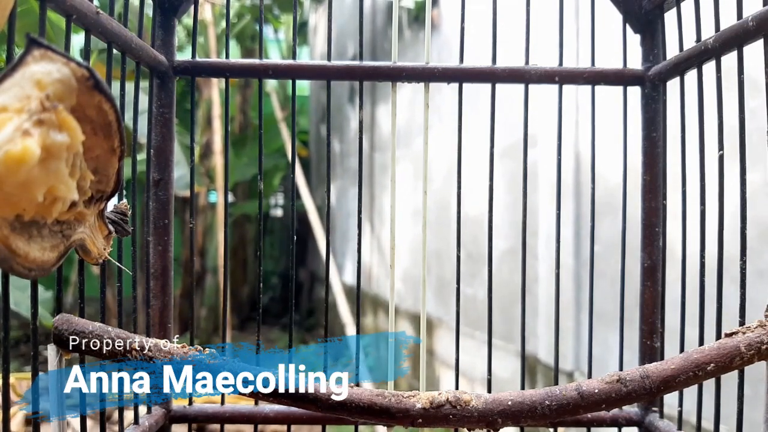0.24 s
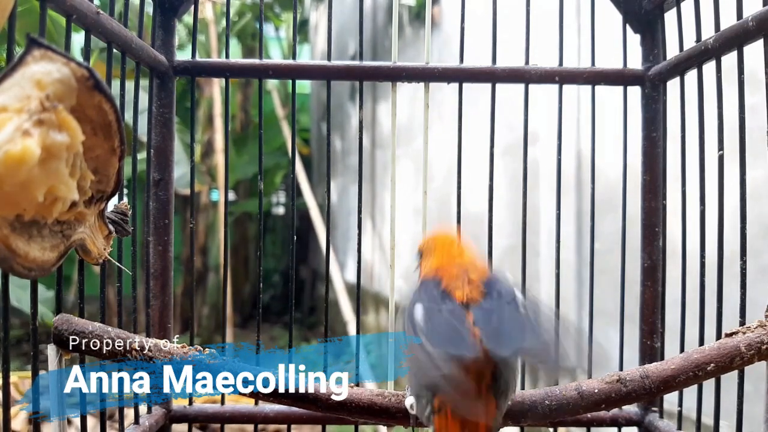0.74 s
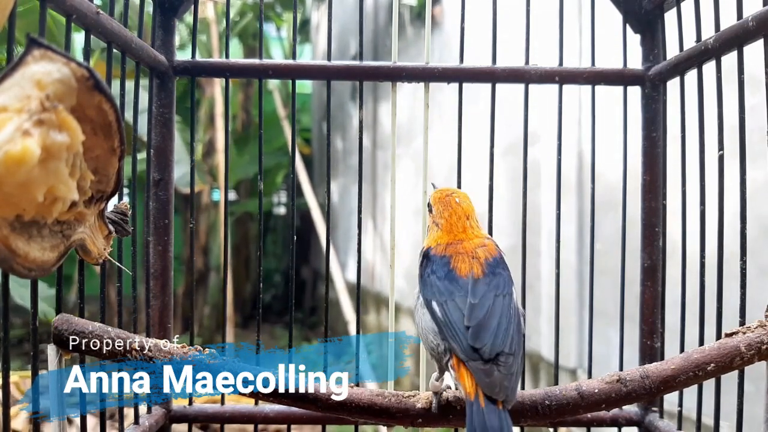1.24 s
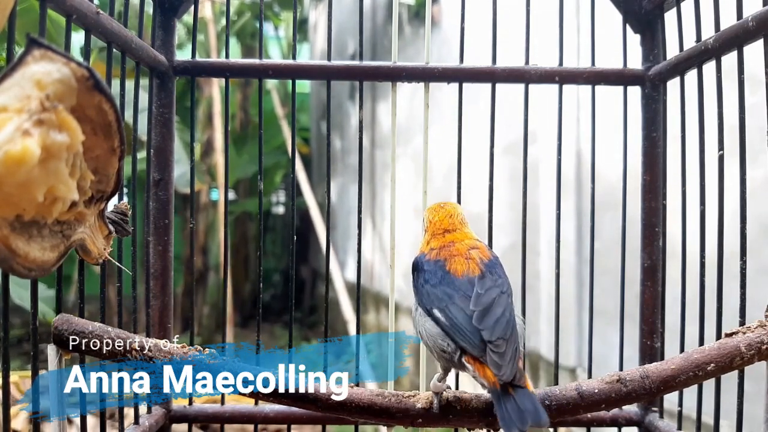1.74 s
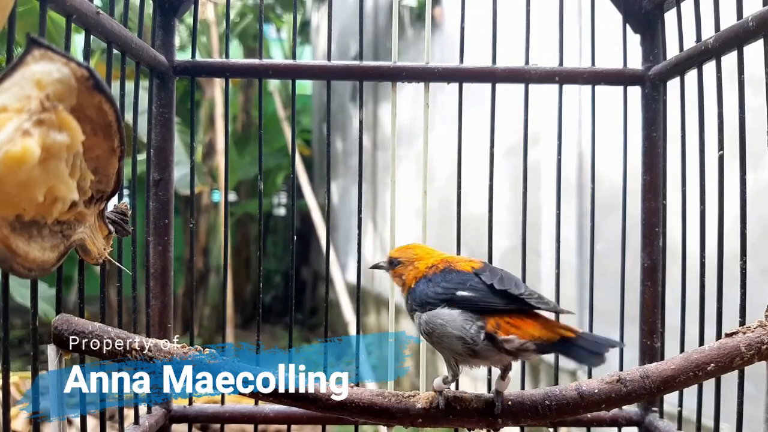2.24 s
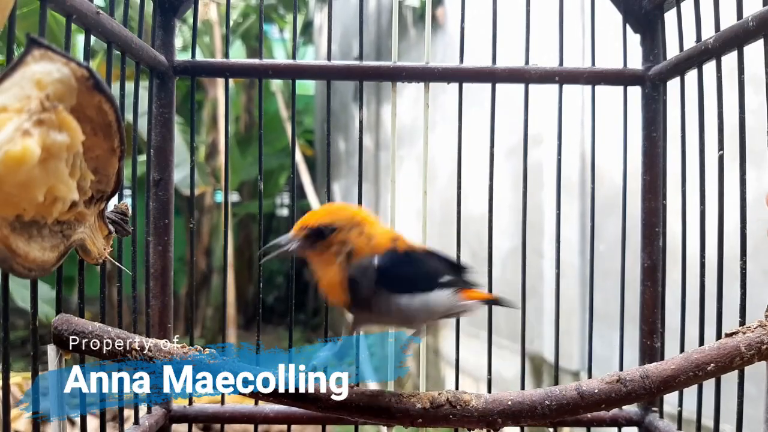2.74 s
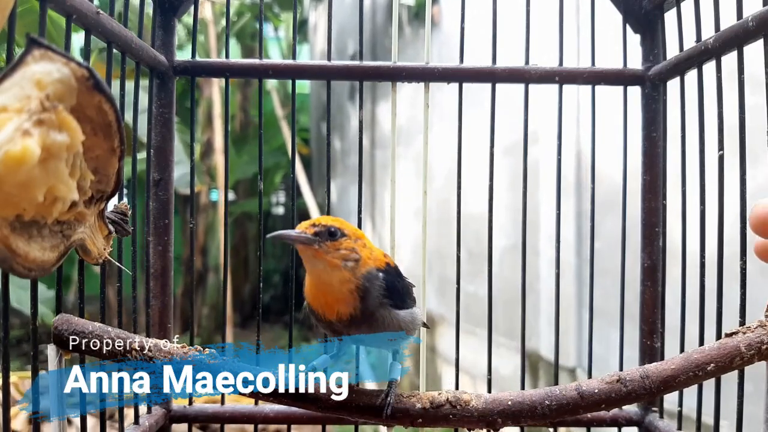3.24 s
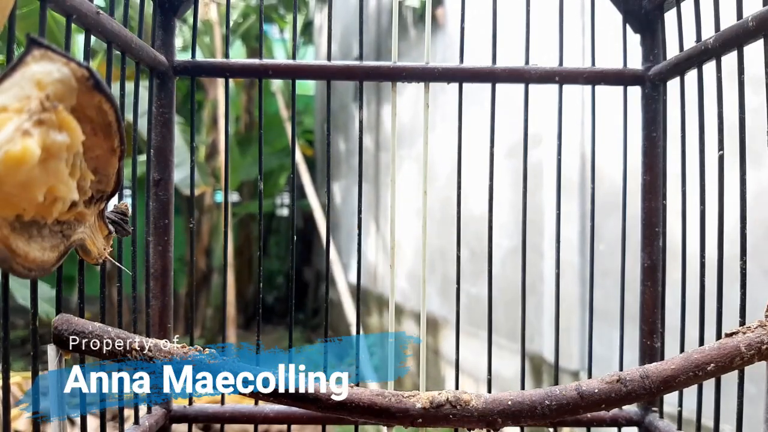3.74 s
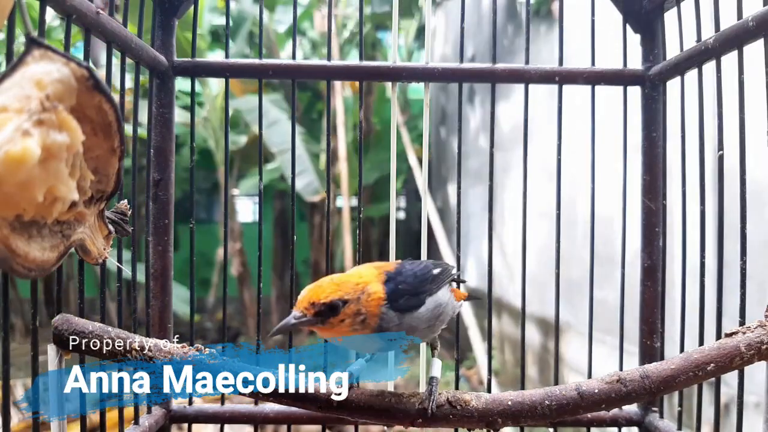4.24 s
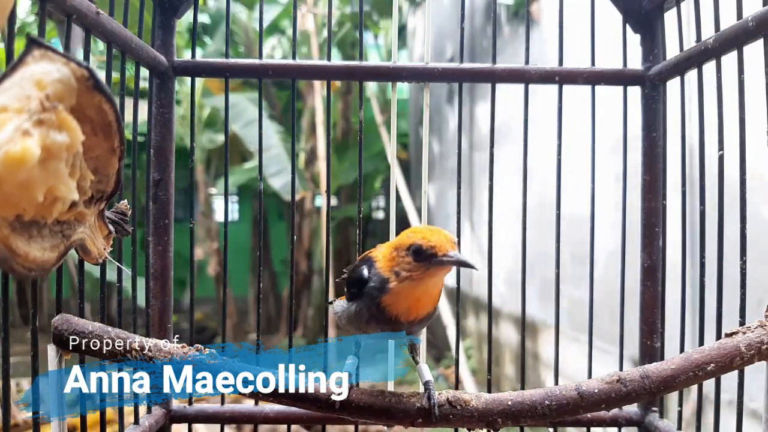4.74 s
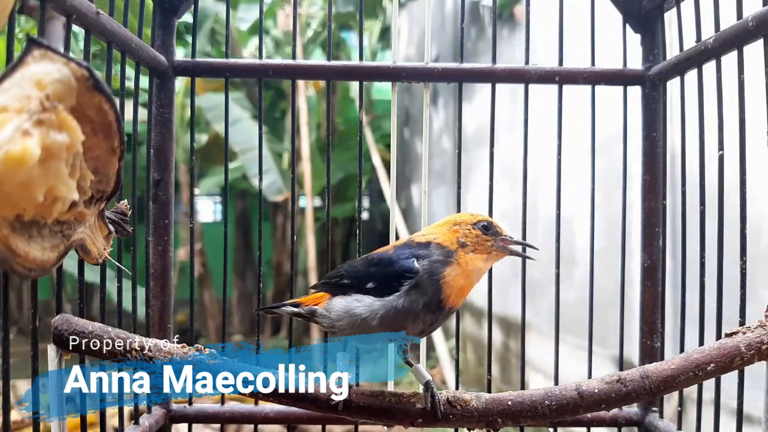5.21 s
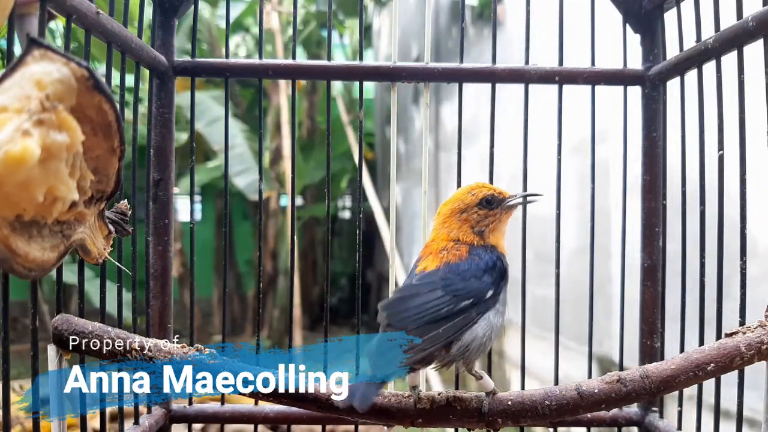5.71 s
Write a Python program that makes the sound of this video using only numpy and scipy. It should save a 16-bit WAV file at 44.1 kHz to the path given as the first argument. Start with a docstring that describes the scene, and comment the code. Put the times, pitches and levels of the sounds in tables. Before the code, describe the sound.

Close stereo pickup of one caged bird, nearly dry with a short bright echo. Loud thin whistles alternate between sudden upward breaks and gliding descents, roughly two or three a second, then thin out before scratchy chips past the middle. Distant birds answer weakly with nasal squawks, squeals and one long soft arching whistle near the end. Low outdoor noise swells quietly underneath.

```python
"""In a yard, a small caged songbird close to the microphone alternates rising and falling whistles and harsh chips.
Its notes are nearly pure tones swept in pitch, shaken where the voice is rough; its feet tick as noise bursts.
Other birds squawk, squeal and whistle further off, heard mostly by way of the walls, as modulated harmonics.
With them a hoarse hiss near 2 kHz comes in waves, made of rough sinking tones through a band-pass.
Beneath lie a few dull thuds and a faint low rumble of coloured noise with a wavering drone."""
import sys
import numpy as np
from scipy import signal
from scipy.fft import rfft, irfft
from scipy.io import wavfile
from scipy.ndimage import uniform_filter1d, minimum_filter1d, map_coordinates

SR = 44100
rng = np.random.default_rng(int(sys.argv[2]) if len(sys.argv) > 2 else 0)


def transcribe(signal):
    """Save signal, clipped to [-1, 1], as a 16-bit WAV file at the path in sys.argv[1]."""
    frames = np.atleast_2d(signal).T
    limited = np.clip(frames, -1, 1)
    pcm = np.round(limited * 32767).astype(np.int16)
    wavfile.write(sys.argv[1], SR, pcm)


N = 263277
TIME = np.arange(N) / SR
TOP_HZ = 15900  # upper limit of the recorder


def undb(db):
    """Amplitude gain is ten to the power of decibels over twenty."""
    return 10 ** (np.asarray(db) / 20)


def unit(x):
    """Normalisation: scale to an rms of 1."""
    return x / np.sqrt(np.mean(x ** 2) + 1e-20)


def join(t, times, values):
    """Linear interpolation through points, with their times forced into order."""
    return np.interp(t, np.maximum.accumulate(times), values)


def band(x, lo_hz, hi_hz):
    """Band-pass filtering keeps the energy between two frequencies."""
    edges = [lo_hz, min(hi_hz, .45 * SR)]
    return signal.sosfilt(signal.butter(2, edges, "band", fs=SR, output="sos"), x)


def wobble(count, hz):
    """Low-passed noise: random motion up to a given speed, of rms 1 before its settling time is cut off."""
    lowpass = signal.butter(4, min(hz, .45 * SR), fs=SR, output="sos")
    noise = signal.sosfilt(lowpass, rng.standard_normal(count + SR // 5))
    return unit(noise)[-count:]


def span(start, end):
    """Sampling instants of a note [s], at least 5 ms long and none before zero."""
    first = int(max(start, 0) * SR)
    last = int(max(end, start + .005) * SR)
    return np.arange(first, last) / SR


def add(out, t, sound):
    """Superposition: mix a sound in at its time."""
    i = min(int(round(t[0] * SR)), N)
    out[..., i:i + sound.shape[-1]] += sound[..., :N - i]


def edges(count, edge_s):
    """A tapered window avoids clicks at both ends of a note."""
    return signal.windows.tukey(count, min(1, 2 * edge_s * SR / count))


def syrinx(t, hz, db, rough, overtone_db, pan_db, lead, waver=0.005, rasp=0.13, flutter_db=2.0,
           rolloff_db=-10, side_hz=3900, side_db=-38, outer_db=-12, air_db=-58, scratch_db=-23,
           edge_s=0.0027):
    """Frequency and amplitude modulation: a nearly pure tone at two ports shakes when the voice is rough."""
    count = len(t)
    smooth_hz = uniform_filter1d(hz, SR // 330)
    hz = smooth_hz * (1 + waver * wobble(count, 190) + rasp * rough * wobble(count, 1100))
    phase = 2 * np.pi * np.cumsum(hz) / SR
    shaken_db = db + flutter_db * wobble(count, 140) + 5.2 * rough * wobble(count, 700)
    size = undb(shaken_db) * edges(count, edge_s)
    # faint tones about 3.9 and 7.8 kHz either side of the whistle, stronger when it is loud
    beat = 2 * np.pi * np.cumsum(side_hz + 45 * wobble(count, 300)) / SR
    side_gain = undb(side_db + 0.27 * (db - db.max()))
    size = size * (1 + 2 * side_gain * (np.cos(beat) + undb(outer_db) * np.cos(2 * beat)))
    third_fade = np.clip((SR / 2 - 3 * hz) / 1000, 0, 1)  # no third harmonic past half the sampling rate
    ports = []
    for side in (1, -1):
        p = phase + side * lead / 2
        tone = np.sin(p) + undb(overtone_db) * np.sin(2 * p)
        tone = tone + undb(overtone_db + rolloff_db) * np.sin(3 * p) * third_fade
        air_gain = undb(air_db) + rough * undb(scratch_db)
        air = air_gain * unit(band(rng.standard_normal(count), 4000, 10000))
        ports.append(undb(side * pan_db / 2) * (np.sqrt(2) * tone + air))
    # the mean power of the two ports does not depend on the level difference
    return size * np.array(ports) / np.sqrt(np.cosh(pan_db * np.log(10) / 20))


def release(t, end, close_s=0.016, depth_db=27):
    """Accelerating decay [dB]: the note dies ever faster as the syrinx closes."""
    return -depth_db * np.clip(1 + (t - end) / close_s, 0, 1) ** 2


def rising_whistles(break_db=12, break_s=0.0006, leap_rough=0.23):
    """Upward sweep: a soft lead-in dips, then leaps to a loud held top, the voice breaking and rough at the leap."""
    # rising whistles: (leap [s], lead-in [s], opening pitch [Hz], top pitch [Hz], level [dB],
    # lead-in over top [dB], octave over fundamental [dB], left minus right [dB], left phase lead [rad])
    rises = [(0.02, 0.019, 3814, 5262, -10, -5, -29.5, 2.5, -1.5),
             (0.652, .026, 4850, 5858, -20, -5.5, -20.5, 3, -2),
             (1.09, 0.025, 4440, 5425, -26, -3.5, -44, 1, -2.5),
             (1.496, 0.027, 4780, 5975, -17, -7, -35.5, 1, -2.5),
             (1.916, 0.047, 4698, 5870, -13.5, -6.5, -30, 2.5, 2.1),
             (2.424, .035, 5900, 6000, -23, -7, -15.5, 3.5, -1.2),
             (2.991, 0.036, 4140, 5610, -10, -5.5, -37, 14, 5.5),
             (3.55, 0.025, 5530, 5835, -24.5, 6, -19, 4, 1.8),
             (5.171, 0.041, 6408, 6100, -7.5, -17.5, -22, 0.5, 2.0),
             (5.643, 0.03, 4500, 5960, -7, -12.5, -23.5, 1, 2.0),
             (5.952, 0.05, 6400, 5805, -13, -16, -32, 4, -2)]
    dip_share = .815  # dip pitch over top pitch
    hold_s, hold_fade_db = 0.044, 1.5  # length of the top and its fade
    out = np.zeros((2, N))
    for knee, lead_s, open_hz, top_hz, db, lead_db, octave_db, pan_db, lead in rises:
        end = knee + hold_s
        t = span(knee - lead_s, end)
        from_knee, dip_hz = t - knee, dip_share * top_hz
        leap_hz = dip_hz + .38 * (top_hz - dip_hz)
        hz = join(from_knee, [-lead_s, -.018, -.004, .004, .018, hold_s],
                  [open_hz, dip_hz, leap_hz, .98 * top_hz, 1.006 * top_hz, .985 * top_hz])
        swell_db = join(from_knee, [-lead_s, -.018, -.010, 0, .005],
                        [lead_db - 21, lead_db - 11, lead_db, lead_db, 0])
        swell_db = swell_db - break_db * np.exp(-(from_knee / break_s) ** 2)
        swell_db = swell_db + hold_fade_db * (.5 - np.maximum(from_knee / hold_s, 0)) * (from_knee > 0)
        rough = .005 + leap_rough * np.exp(-(from_knee / 0.0035) ** 2)
        level_db = db + swell_db + release(t, end)
        add(out, t, syrinx(t, hz, level_db, rough, octave_db, pan_db, lead))
    return out


def falling_whistles():
    """Exponential glide: a thin high start slides down and swells as it settles."""
    # falling whistles: (start [s], swell [s], length [s], top pitch [Hz], bottom pitch [Hz], level [dB],
    # octave over fundamental [dB], left minus right [dB], left phase lead [rad])
    falls = [(.175, 0.028, 0.061, 8340, 6160, -6, -22, -1, -1.14),
             (0.787, 0.064, 0.1, 8270, 6690, -15.5, -23, 4.5, -1.1),
             (1.665, 0.082, .110, 8550, 6592, -7.5, -31.5, 2, -2.5),
             (2.699, .060, 0.097, 8270, 6620, -9.5, -24.5, 13.5, 2),
             (5.316, 0.082, 0.097, 8260, 6610, -9, -28.5, 6.5, 3.5),
             (5.749, 0.027, 0.1, 6940, 6470, -14, -32.5, 2.5, 4)]
    out = np.zeros((2, N))
    for start, swell_s, length, top_hz, bottom_hz, db, octave_db, pan_db, lead in falls:
        end = start + length
        t = span(start, end)
        glide_s = .009 + 0.18 * swell_s  # the slower the swell, the slower the slide
        slide = np.exp(-np.maximum(t - start - .01, 0) / glide_s)
        hz = bottom_hz + (top_hz - bottom_hz) * slide
        swell_db = -34 * np.clip(1 - (t - start) / swell_s, 0, 1) ** 1.6
        level_db = db + swell_db + release(t, end)
        add(out, t, syrinx(t, hz, level_db, 0.016, octave_db, pan_db, lead))
    return out


def chips(second_rough=0.32):
    """Two sources: rough arches, joined from the crest on by a second pitch from the other side of the syrinx."""
    # harsh chips: (crest [s], rise [s], fall [s], crest pitch [Hz], level [dB], roughness [0-1],
    # octave over fundamental [dB], second voice [Hz], second voice over first [dB],
    # left minus right [dB], left phase lead [rad])
    arches = [(3.524, 0.021, 0.007, 5590, -21.5, 0.09, -22.5, 4510, 4, 2, 1.8),
              (4.047, 0.0058, 0.019, 6030, -14.5, 0.6, -18, 4450, -9.5, 4, -1.0),
              (4.137, .018, 0.045, 6740, -9, 0.14, -21.5, 6580, -11.5, 8, 1.44),
              (4.254, .020, 0.023, 4405, -19.5, 0.15, -3, 4020, -15, 10, -1),
              (5.744, 0.0035, 0.012, 4445, -26.5, 0.28, -31, 6220, -5.5, 2, -1)]
    start_share = 0.53  # opening pitch over crest pitch
    sag_hz_per_s, gain_after_crest_db = 32000, 5.5
    out = np.zeros((2, N))
    for (crest, rise_s, fall_s, crest_hz, db, rough, overtone_db,
         second_hz, second_db, pan_db, lead) in arches:
        end = crest + fall_s
        t = span(crest - rise_s, end)
        before = np.clip((crest - t) / rise_s, 0, 1)
        after = np.maximum(t - crest, 0)
        hz = crest_hz * (1 - (1 - start_share) * before ** 2) - sag_hz_per_s * after
        shape_db = -22 * before ** 2 + gain_after_crest_db * after / fall_s
        shape_db = shape_db + release(t, end, close_s=0.045, depth_db=15)
        add(out, t, syrinx(t, hz, db + shape_db, rough, overtone_db, pan_db, lead))
        t = span(crest, end + 0.005)
        hz = np.full(len(t), 1. * second_hz)
        level_db = db + second_db + release(t, t[-1], close_s=0.023, depth_db=22.5)
        add(out, t, syrinx(t, hz, level_db, second_rough, -15, pan_db, lead))
    return out


def hops(tick_s=0.0032):
    """Impact noise: claws tick on wood as high-band bursts that decay exponentially."""
    # feet on the perch and bars: (time [s], level before the decay [dB])
    ticks = [(0.547, -54.5), (3.759, -61.5), (3.965, -54), (4.239, -30.5)]
    out = np.zeros(N)
    for start, db in ticks:
        t = span(start, start + 0.026)
        noise = unit(band(rng.standard_normal(len(t)), 3300, 15000))
        add(out, t, undb(db) * np.exp((t[0] - t) / tick_s) * noise)
    return out


def far_tone(t, hz, db, rough, colour, edge_s, rasp=.11, flutter_db=4, count=5):
    """Source and filter: harmonics of one distant sound, clear to scratchy, are weighted by a spectrum."""
    pitch = hz * (1 + rasp * rough * wobble(len(t), 248))
    phase = 2 * np.pi * np.cumsum(pitch) / SR
    colour_hz, colour_db = np.transpose(colour)
    tone = np.zeros(len(t))
    for k in range(1, count + 1):
        weight = undb(join(np.log(k * hz), np.log(colour_hz), colour_db))
        tone += weight * np.sin(k * phase) * (k * pitch < TOP_HZ)
    # uneven cycles spread a haze around each partial
    haze = 1 + .65 * rough * wobble(len(t), hz[0] / 4)
    size = undb(db + flutter_db * wobble(len(t), 60)) * haze
    return np.sqrt(2) * tone * size * edges(len(t), edge_s)


def squawks(scoop=.04, swell_s=0.055):
    """Voice break: a clear nasal note creeps up and swells, then roughens as a second, higher voice joins."""
    # squawks: (start [s], break [s], end [s], pitch [Hz], level before throat and mixing [dB],
    # roughness after the break [0-1], second voice over first [dB])
    calls = [(-.06, 0.001, 0.24, 2515, -46, 0.24, 1.5), (1.407, 1.504, 1.65, 2474, -43, 0.46, -2),
             (3.038, 3.167, 3.235, 2224, -41, 0.18, 1), (4.144, 4.20, 4.354, 2152, -47.5, .5, 6)]
    # resonance of the squawking throat: (frequency [Hz], gain [dB])
    throat = [(2200, -10), (2750, -15.5), (3150, -7), (4500, 1), (5500, -5), (6100, -7), (6800, -27.5),
              (9000, -26), (12000, -19.5), (13500, -31.5)]
    clear_rough, swell_depth_db, second_ratio = 0.12, 15.5, 1.32
    out = np.zeros(N)
    for start, broken, end, pitch_hz, db, broken_rough, second_db in calls:
        t = span(start, end)
        before = np.clip(1 - (t - start) / swell_s, 0, 1)
        rough = np.where(t < broken, clear_rough, broken_rough)
        hz = pitch_hz * (1 - scoop * before)
        add(out, t, far_tone(t, hz, db - swell_depth_db * before, rough, throat, edge_s=0.025))
        t = span(broken, end)
        hz = second_ratio * pitch_hz * np.linspace(1, .96, len(t))
        add(out, t, far_tone(t, hz, db + second_db, .42, throat, edge_s=.03))
    return out


def squeals():
    """Linear glides: high notes roughened by random modulation."""
    # squeals: (start [s], length [s], start pitch [Hz], end pitch [Hz],
    # level before colour and mixing [dB], roughness [0-1])
    glides = [(0.04, 0.19, 3940, 3912, -43.5, 0.43), (1.672, .085, 4540, 3757, -35.5, 0.31),
              (1.713, 0.12, 3626, 3545, -39, 0.17), (1.826, 0.13, 4178, 4437, -38, 0.7),
              (4.337, 0.132, 4127, 3968, -50, 0.46)]
    # weight of the harmonics: (frequency [Hz], gain [dB])
    colour = [(3000, 2.5), (5000, -3.5), (7500, -25), (11500, -21.5), (14000, -35.5)]
    out = np.zeros(N)
    for start, length, start_hz, end_hz, db, rough in glides:
        t = span(start, start + length)
        hz = np.linspace(start_hz, end_hz, len(t))
        add(out, t, far_tone(t, hz, db, rough, colour, edge_s=0.015))
    return out


def hoarse_band():
    """Random modulation in a fixed band: a hoarse hiss near 2 kHz comes in waves, sinking in pitch and fading."""
    # waves of the hiss: (start [s], length [s], opening pitch [Hz], level before colour, fade and mixing [dB])
    waves = [(0.0, 0.41, 1504, -68.5), (0.356, 0.57, 1843, -70.5), (0.847, 0.75, 2414, -70.5),
             (1.446, .62, 2010, -61.5), (2.272, 0.88, 1872, -57.5), (3.497, 0.71, 1953, -58.5),
             (3.96, 0.55, 1745, -57), (4.602, 0.48, 2095, -63.5), (5.14, 0.31, 2070, -69),
             (5.597, 0.51, 1940, -56.5)]
    # weight of the harmonics: (frequency [Hz], gain [dB])
    colour = [(1200, -1.5), (2400, -4.5), (2900, -39), (6000, -44.5), (14000, -55)]
    sag_hz_per_s, fade_db_per_s, rough = 650, 14, 0.56
    out = np.zeros(N)
    for start, length, open_hz, db in waves:
        t = span(start, start + length)
        age = t - start
        hz = open_hz - sag_hz_per_s * age
        add(out, t, far_tone(t, hz, db - fade_db_per_s * age, rough, colour, edge_s=0.081))
    return band(out, 1340, 2300)


def far_harsh_sounds():
    """Superposition of distant squawks, squeals and a hoarse hiss."""
    return squawks() + squeals() + hoarse_band()


def long_whistle(waver=0.0145, haze=0.1, gain_db=2):
    """Frequency modulation: a slightly husky sine arches slowly up and down."""
    # one long distant whistle: (time [s], pitch [Hz], level before gain and mixing [dB])
    arch = [(4.95, 2470, -76), (5.022, 2509, -57.5), (5.222, 2537, -56.5), (5.23, 2777, -53.5),
            (5.322, 2983, -45), (5.536, 2962, -46), (5.882, 2533, -54), (5.95, 2508, -68)]
    s, hz, db = np.transpose(arch)
    hz = join(TIME, s, hz) * (1 + waver * wobble(N, 200))
    size = undb(join(TIME, s, db) + gain_db) * (1 + haze * wobble(N, 590)) * (TIME > s[0])
    return np.sqrt(2) * np.sin(2 * np.pi * np.cumsum(hz) / SR) * size


def thuds():
    """Band-limited noise: brief dull low thuds under a few notes, each with a bell-shaped envelope."""
    # thuds: (start [s], length [s], low edge [Hz], high edge [Hz], level at the middle [dB])
    puffs = [(0.195, 0.034, 35, 170, -56.5), (2.739, 0.077, 50, 201.7, -65),
             (4.122, 0.063, 600, 1250, -45.5)]
    out = np.zeros(N)
    for start, length, lo_hz, hi_hz, db in puffs:
        t = span(start, start + length)
        noise = unit(band(rng.standard_normal(len(t)), lo_hz, hi_hz))
        add(out, t, undb(db) * np.hanning(len(t)) * noise)
    return out


def rumble(width=.4, hum_hz=138, gain_db=4.5, bass_hz=250, dulling=0.75):
    """Spectral shaping: low outdoor noise swells and ebbs, with narrow-band noise as a wavering drone."""
    # level of the low outdoor noise: (time [s], level before gain [dB])
    course = [(0.0, -72), (0.11, -85), (0.35, -87.5), (1.5, -79.5), (1.77, -69.5), (1.86, -70.5),
              (2.15, -78.5), (2.43, -74.5), (2.64, -68), (2.89, -65.5), (3.29, -65.5), (3.5, -73),
              (4.31, -70), (4.53, -77), (4.81, -87.5), (5.93, -86)]
    # spectrum of that noise: (frequency [Hz], relative density [dB per Hz])
    colour_table = [(24, -58.5), (40, -25.5), (135, -6), (202, -10.5), (331, -3), (407, -6), (618, -8.5),
                    (1190, -13), (1400, -23), (1820, -40.5), (3080, -120)]
    hum_start_s, hum_end_s, hum_attack_s, hum_release_s, hum_db = 3.04, 3.98, 0.29, 0.029, -66.5
    hz, db = np.transpose(colour_table)
    bins_hz = np.arange(N // 2 + 1) * SR / N
    colour = undb(np.interp(np.log(bins_hz + 1), np.log(hz), db, left=-50, right=-60))
    mid, side = (unit(irfft(rfft(rng.standard_normal(N)) * colour, N)) for _ in range(2))
    size = undb(join(TIME, *np.transpose(course)) + gain_db + 0.41 * wobble(N, 17))
    attack = (TIME - hum_start_s) / hum_attack_s
    decay = (hum_end_s - TIME) / hum_release_s
    swell = np.clip(np.minimum(attack, decay), 0, 1)
    hum = unit(band(rng.standard_normal(N), .85 * hum_hz, 1.096 * hum_hz))
    drone = undb(hum_db) * swell * hum
    noise = mid + width * np.array([[1], [-1]]) * side
    bass = signal.sosfiltfilt(signal.butter(2, bass_hz, fs=SR, output="sos"), noise)
    # the quieter the noise, the duller
    return size * (bass + (size / size.max()) ** dulling * (noise - bass)) + drone


def walls(x, t60_s, gap_s, treble_hz):
    """Reverberation: convolve with dense decaying noise, different at each port, whose treble dies sooner."""
    t = np.arange(SR) / SR
    noise = rng.standard_normal((2, SR))
    lowpass = signal.butter(2, min(treble_hz, .45 * SR), fs=SR, output="sos")
    low = signal.sosfiltfilt(lowpass, noise)
    fade = undb(-60 * t / t60_s) * (t > gap_s)
    treble = (noise - low) * undb(-30 * t / t60_s)
    echoes = (low + treble) * fade / np.sqrt(np.sum(fade ** 2))
    return signal.fftconvolve(x * np.ones((2, 1)), echoes, axes=1)[:, :N]


def cage(x, gain_db=-26, count=6):
    """Comb filtering: quick reflections from the perch, tray and frame ripple every sweep."""
    out = x.copy()
    for port in range(2):
        for lag in rng.integers(SR // 1000, SR // 110, count):
            out[port, lag:] += undb(gain_db) / np.sqrt(count) * x[port, :-lag]
    return out


def blur(x, speed_hz=220):
    """Phase modulation: a slightly restless delay spreads ringing lines into a wash."""
    depth_s = .00001
    ports = []
    for port in x:
        read_at = (TIME + depth_s * wobble(N, speed_hz)) * SR
        ports.append(map_coordinates(port, [read_at], mode="nearest"))
    return np.array(ports)


def scene():
    """Direct-to-reverberant ratio: the caged bird is nearly dry, the distant sounds nearly all echo."""
    song = rising_whistles() + falling_whistles() + chips()
    bird = band(song, 800, TOP_HZ + 3000) + hops()  # so small a beak radiates no bass
    far = far_harsh_sounds() + long_whistle()
    near_echo = undb(-22.0) * blur(walls(bird, t60_s=0.3075, gap_s=0.01, treble_hz=8900))
    far_echo = undb(4.5) * walls(far, t60_s=0.38, gap_s=0.0026, treble_hz=12000)
    return cage(bird) + near_echo + undb(-5.5) * far + far_echo + rumble() + thuds()


def record(dry):
    """Peak limiting: a quick gain holds the loudest peaks under full scale, then a low-pass cuts the top."""
    headroom = np.minimum(1, .87 / (np.abs(dry) + 1e-9))
    lowest = minimum_filter1d(headroom, size=177, axis=1)
    gain = uniform_filter1d(lowest, size=89, axis=1)
    return signal.sosfilt(signal.ellip(10, .2, 80, TOP_HZ, fs=SR, output="sos"), dry * gain)


dry = scene()
out = record(dry)
transcribe(out)
```